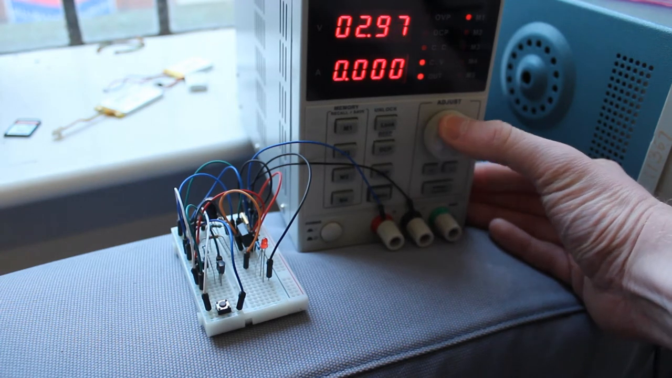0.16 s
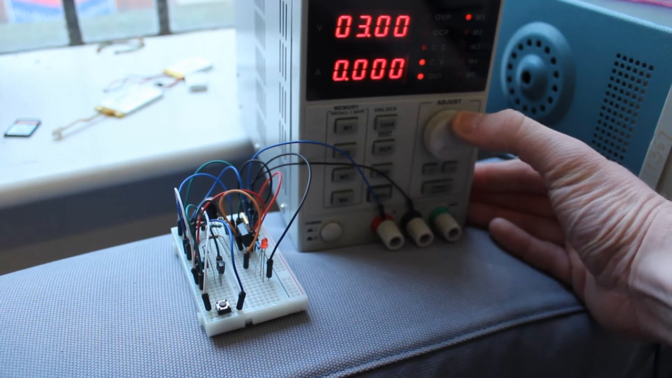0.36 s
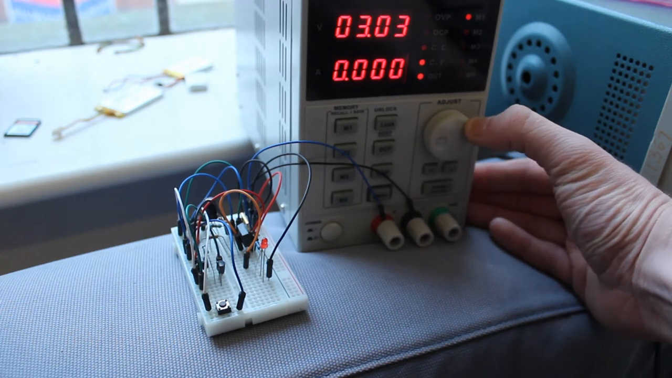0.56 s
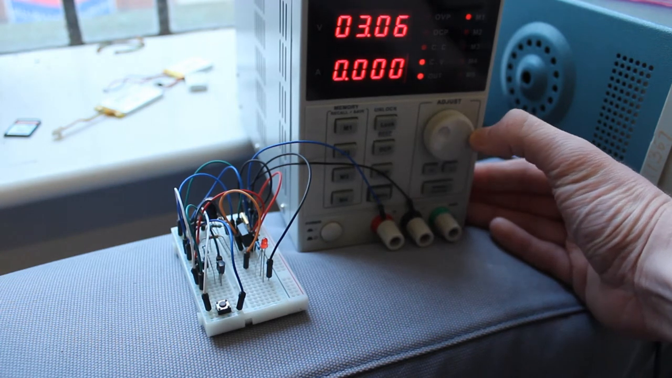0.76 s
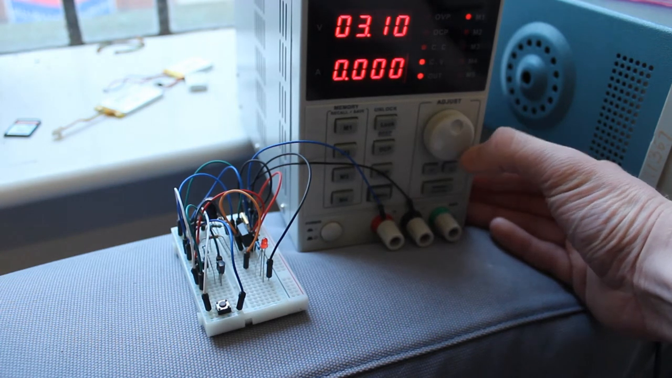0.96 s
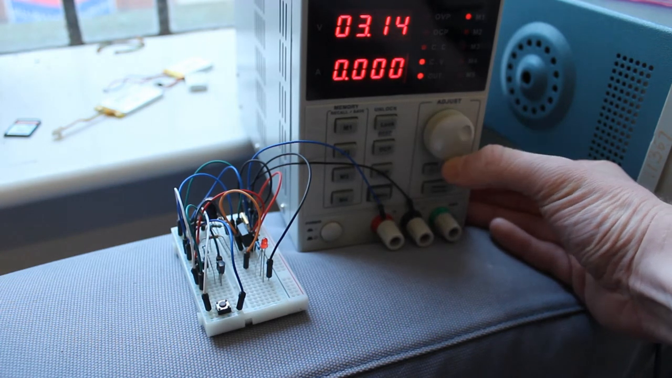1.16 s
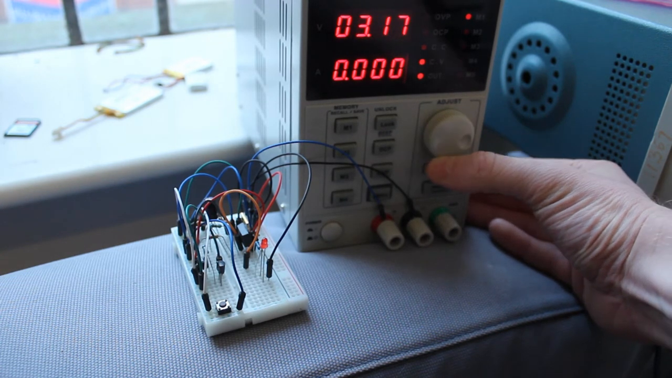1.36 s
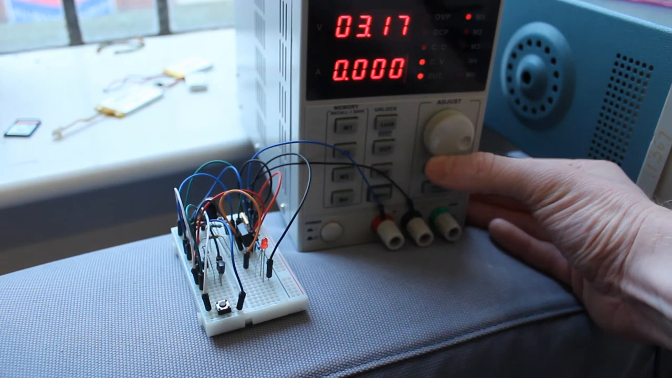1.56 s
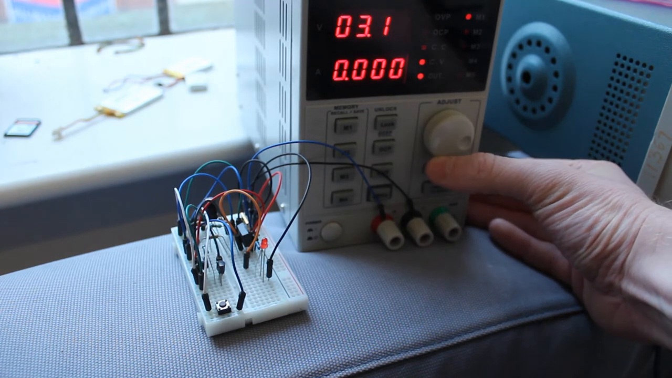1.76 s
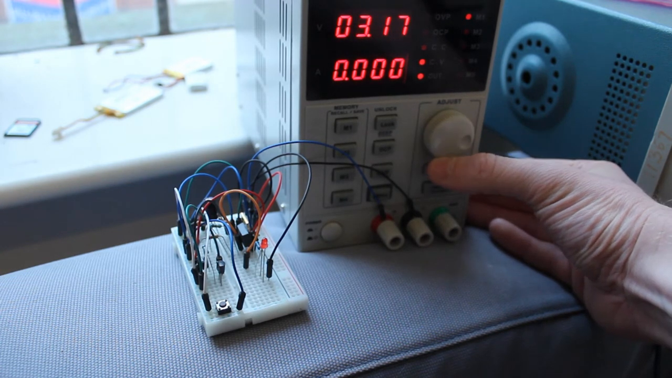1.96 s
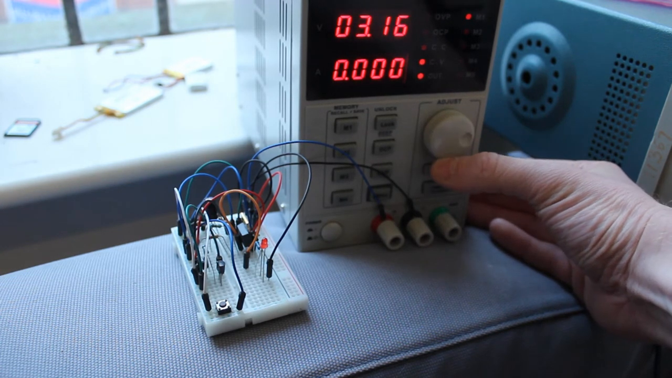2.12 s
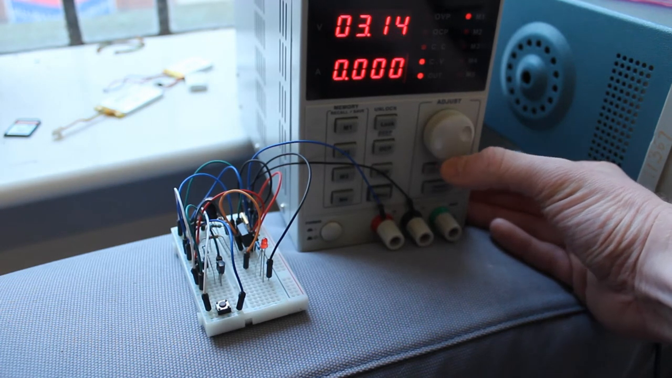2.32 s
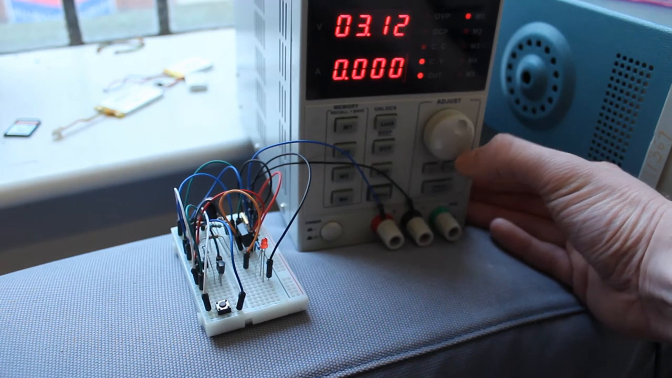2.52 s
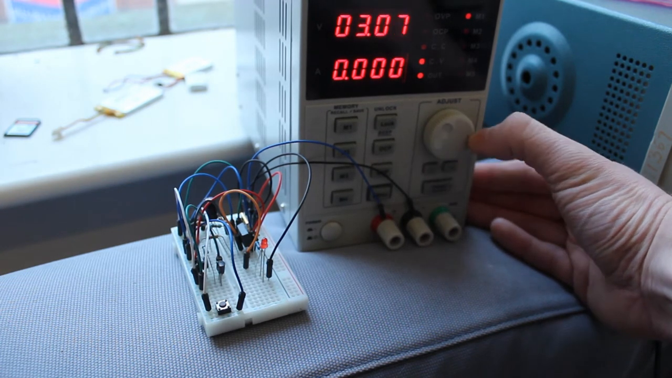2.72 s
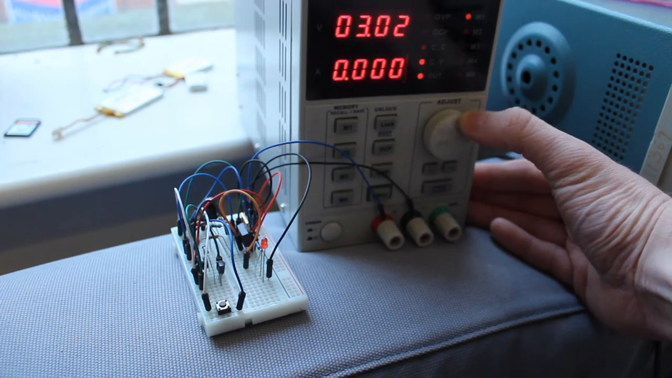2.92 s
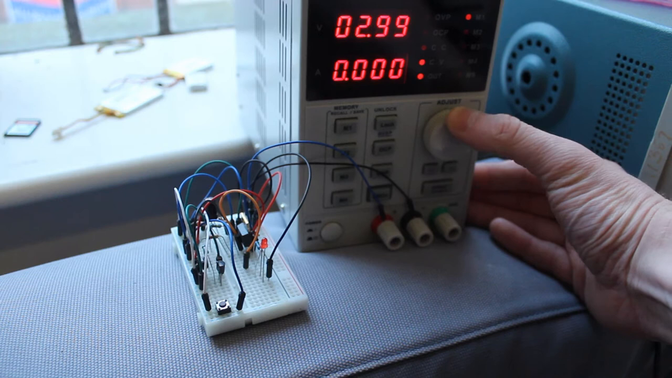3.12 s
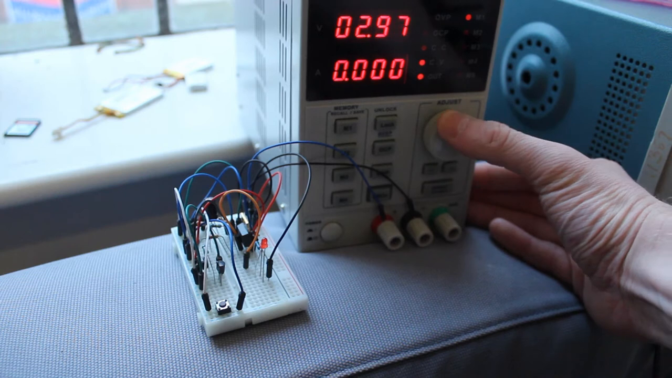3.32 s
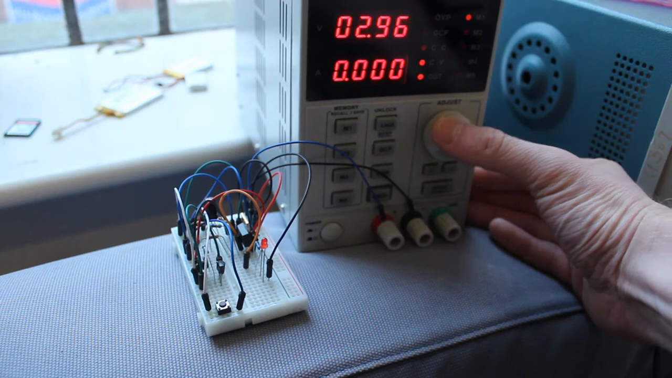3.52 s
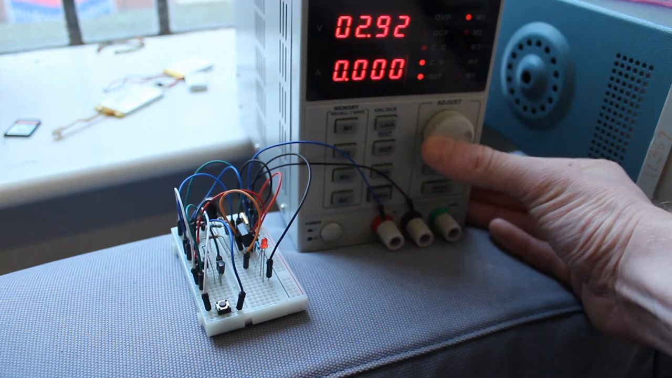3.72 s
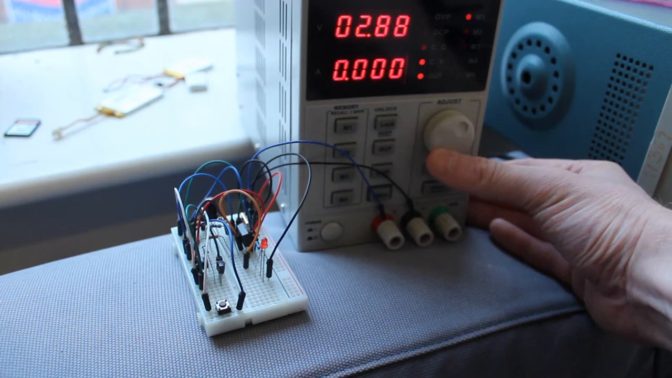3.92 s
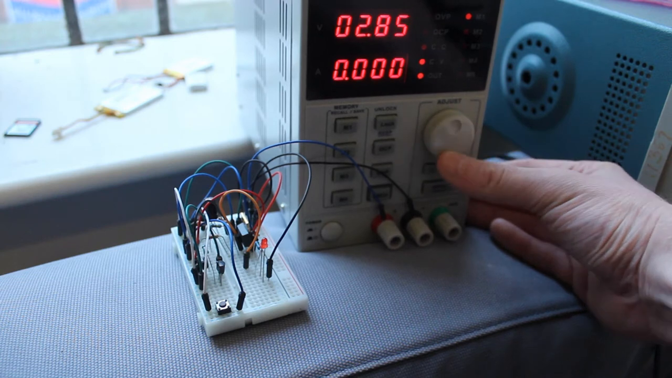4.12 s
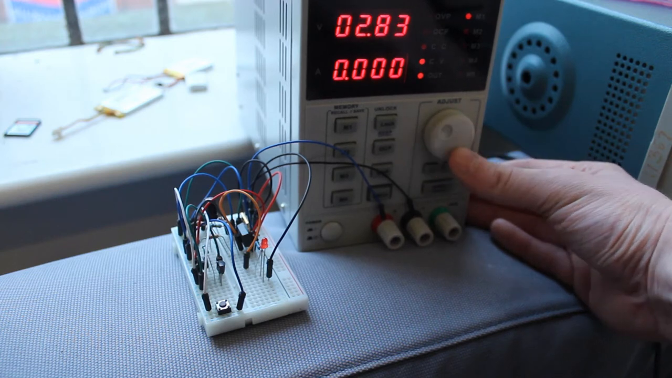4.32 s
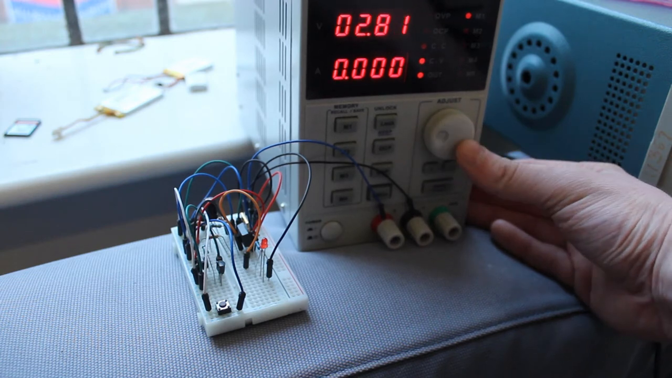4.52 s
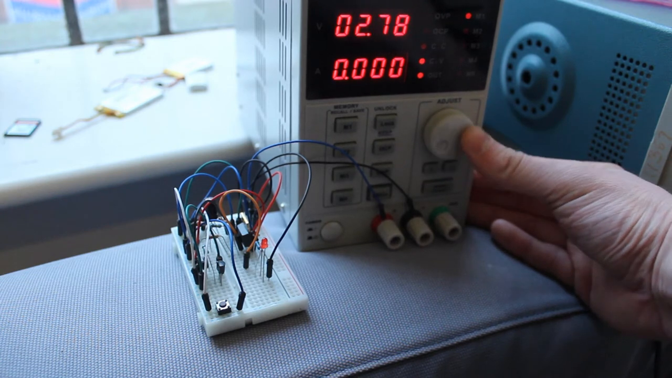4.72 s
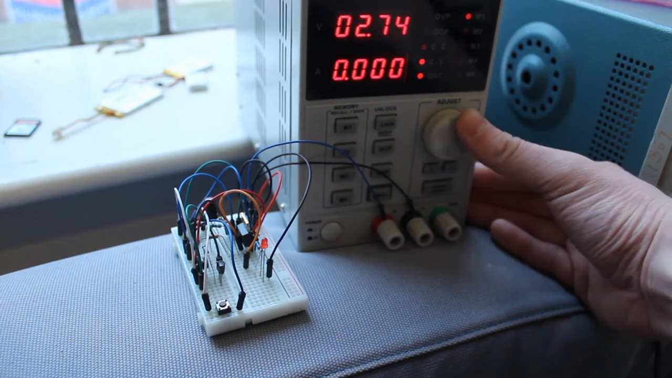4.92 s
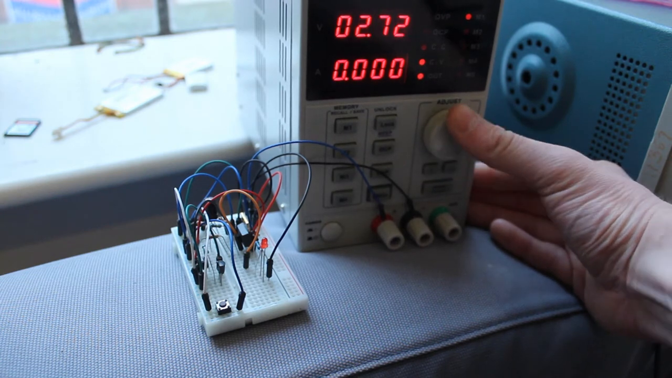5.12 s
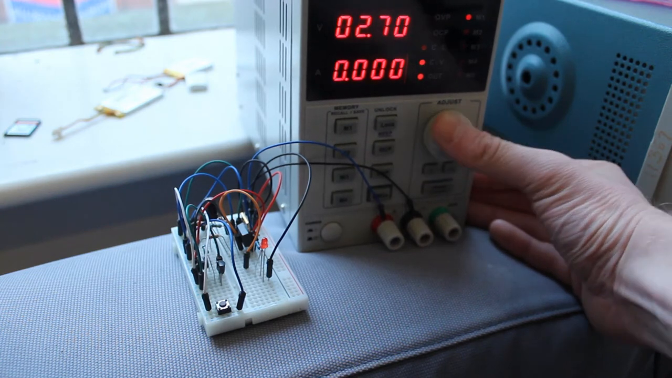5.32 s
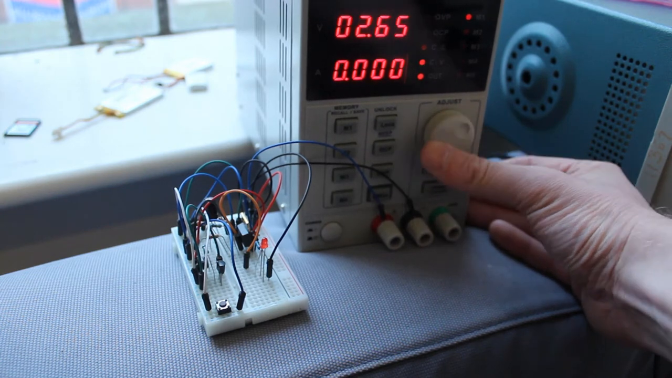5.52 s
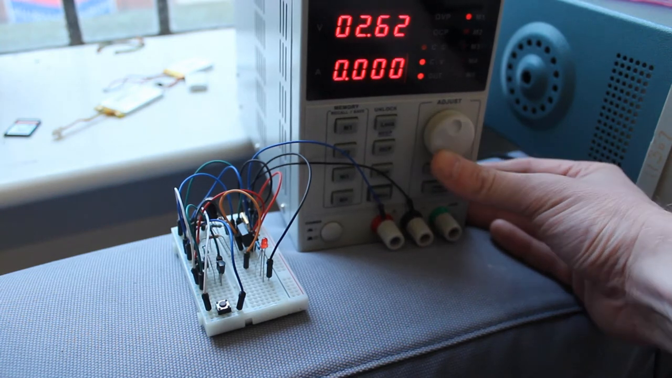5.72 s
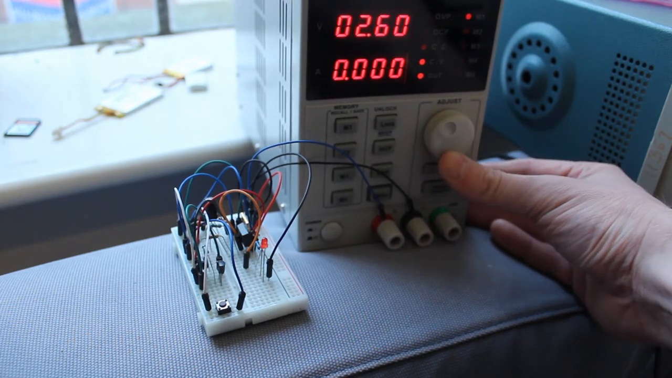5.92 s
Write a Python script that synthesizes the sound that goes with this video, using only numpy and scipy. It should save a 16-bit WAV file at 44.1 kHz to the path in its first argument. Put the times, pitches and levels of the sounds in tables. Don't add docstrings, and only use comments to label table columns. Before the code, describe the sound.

A small room with a steady, quiet fan rush, mostly low-mid and airy, fluttering slightly, with a very faint low mains hum. From about 0.1 s a notched knob is turned by hand near the microphone: hard, bright clicks, each a few milliseconds of spring snap and panel ring, roughly ten to fifteen a second in uneven clusters. A faint dull skin rub slips by at 0.5 s. Clicks become more spaced after 1 s and stop near 1.35 s. Only the fan and hum remain until 2.1 s, when clicking resumes, densest around 2.4 to 3.1 s, then somewhat sparser to about 4.1 s. It sweeps on, with another soft rub at 4.6 s and tight flurries near 4.8 and 5.4 to 5.6 s, thinning to a last click just after 6 s. Strength varies slightly; some rattle looser. Short, light room reverberation follows each.

```python
import sys
import numpy as np
from scipy import signal
from scipy.fft import rfft, irfft, next_fast_len
from scipy.io import wavfile
from scipy.ndimage import uniform_filter1d

SR = 44100
rng = np.random.default_rng(int(sys.argv[2]) if len(sys.argv) > 2 else 0)


def how_loud(loudness_db):
    steps = np.asarray(loudness_db, float) / 20
    return 10 ** steps


def store_pcm(level_fs):
    pcm = np.round(np.clip(level_fs, -1, 1) * 32767).astype(np.int16)
    wavfile.write(sys.argv[1], SR, np.atleast_2d(pcm).T)


N = 267642
FAINT_TOP_HZ = 15800


def detents():
    firm_up = [0.226, 0.2992, 0.4763, 0.5396, 0.6051, 0.6663, 0.7426, 0.9613, 1.2314, 1.3541]
    firm_back = [2.418, 2.499, 2.5684, 2.6006, 2.6875, 2.721, 2.74, 2.8286, 2.8551, 2.9475, 2.9602, 3.069,
                 3.1016, 3.4481, 3.6237, 3.7215, 3.7714, 3.9391]
    firm_on = [4.0863, 4.2439, 4.316, 4.3818, 4.452, 4.6433, 4.9028, 4.9453, 5.0764, 5.353, 5.4399, 5.5705,
               5.6912, 5.7717, 6.0526]
    # start_s, slack (0-1)
    loose = [(0.137, 0.4), (0.3714, .8), (0.4256, 0.8), (0.8267, 0.8), (0.8593, 0.2), (0.905, 0.86),
             (1.0765, .25), (1.1906, .35), (2.1235, .65), (2.2597, .25), (2.3552, .35), (2.9236, .7),
             (3.0018, .8), (3.319, .95), (3.5719, 0.3), (3.6816, .65), (3.8164, .45), (3.8753, .85),
             (4.0016, .45), (4.1677, 0.4), (4.603, .35), (4.7576, .45), (4.7855, .98), (4.8108, .25),
             (5.0089, .25), (5.198, .25), (5.422, 0.6), (5.4769, 0.74), (5.8751, 0.9)]
    light = [
        1.0157,
        1.1314,
        1.3012,
        3.2059,
        5.4602,
        5.5451,
        5.6148,
    ]
    muted = [
        .426,
        2.924,
        3.817,
        3.875,
        4.786,
    ]
    # panel_db, spring_db, shell_db, collar_db, longer (added factor of panel ring length)
    slack_rule = (-.4, -1, 0.8, 11.5, 0.0342)
    light_rule = (0.2, -3, -1.4, 2.5, 0.1417)
    back_rule = (0.17, 0.65, .1, .1, 0.035)
    scatter = (.4, 0.44, .3, .7, 0.031)

    earlier_s = -.06
    firm = firm_up + firm_back + firm_on + [earlier_s]
    loose_s, slack = np.transpose(loose)
    start_s = np.concatenate([firm, loose_s, light])
    change = np.vstack([
        np.zeros((len(firm), len(scatter))),
        np.outer(slack, slack_rule),
        [light_rule] * len(light),
    ])
    turns_back_s = 1.75
    change += np.outer(start_s > turns_back_s, back_rule)
    change += rng.standard_normal(change.shape) * scatter
    is_muted = np.abs(start_s[:, None] - muted).min(axis=1) < .005
    change[is_muted, 1] += -2.5
    return np.column_stack([start_s, change]).T[..., None]


def ring(modes, ms, linger):
    out = 0
    chance = rng.standard_normal((len(ms), len(modes), 3))
    for k, (hz, late_ms, swell_ms, db) in enumerate(modes):
        age_ms = np.maximum(ms - late_ms - .008 * chance[:, k, :1], 0)
        grown = age_ms / (swell_ms * linger)
        envelope = grown * np.exp(1 - grown)
        gain = (-1) ** k * how_loud(db + 1.93 * chance[:, k, 1:2])
        pitch_hz = hz * (1 + .004 * chance[:, k, 2:])
        out = out + gain * envelope * np.sin(2 * np.pi * pitch_hz * age_ms / 1000)
    rms_10ms = np.sqrt((out ** 2).sum(axis=1, keepdims=True) / (SR / 100))
    return out / rms_10ms


def knob(snaps, hold, size=1024, count=8192):
    # pitch_hz, late_ms, swell_ms, level_db
    panel = [(2321, 6.25, 2.67, -25), (2360, 4.0, 0.63, -16.5), (2780, 4.5, 2.7, -33.5),
             (2830, 2, 0.91, -19), (3232, 0.0, 1.62, -17.5), (3430, 6.5, 0.92, -22.0),
             (3588, 0.0, 1.9, -22.5), (3783, 2, 2.23, -10.5), (3900, 3, 3, -18), (3928, 0.0, 1.95, 0.0),
             (4260, 0.5, 2.7, -13.0), (4600, 3, 1.1, -17.5), (4780, 1, 0.87, -11.5),
             (5093, 2.5, 2.15, -15.5), (5426, 0.45, 1.94, -10.0), (5795, 0.5, 2.7, -18.5)]
    spring = [(6360, 2.5, 2.8, -19.5), (6560, 5, 0.28, -15), (6550, 6.48, 2.7, -21), (6654, 0.5, 1.6, -18),
              (6810, 2.0, 0.64, 0.0), (7180, 0.499, 2.5, -15.5)]
    shell = [(8045, 0.0, 1.28, -13.5), (8420, 0.5, 2, -22), (9110.0, 1.0, 0.53, -14.5),
             (9500, 4.5, 0.9, -18), (9790, 0.5, 0.29, -8.0), (9810, 1.3, 0.97, -19.0),
             (10580, -0.5, 2.2, -17.5), (10700, 5, 1.7, -32), (10920, 4, 0.7, -15),
             (11200, 6.5, 0.9, -17.5), (11260, 0.1, 0.71, -7.5), (11670, 0.5, 0.99, -15.5),
             (11900, 0.5, 0.28, -19.0), (12300, 4.5, 1.9, -29), (11960, 2.0, 0.49, -6.0),
             (12440, 3.5, 0.55, -7.0), (12700, 7.5, 0.72, -18.5), (12640, 0.0, 1.8, -17.5),
             (12650, 0.5, 0.28, -6), (13570.0, 3, 1.8, -25.0), (13900, 0.5, 0.3, -5),
             (14240.0, 0.0, 1.3, -16.5), (14600.0, 5.25, 0.9, -25.0), (14750, 1, 1.3, -20),
             (15000, 2.5, 0.3, -9.5), (15270, 1.5, 0.87, -10.5),
             (4385, .4, 1.55, -15.5), (10050, .6, .9, -17.5), (12670, 1.1, 1.5, -12)]
    collar = [(2714, 1.21, .9, -22.5), (4455, 0.608, 1.2, -18), (4850, 0.29, 0.84, -14),
              (6020, 0.593, 1.55, -11), (8710, 0.297, 0.85, -20)]
    casing = [(2082, 2.484, 1.6, -1.5), (1740, 1.46, 0.58, -10), (3922, 2.6, 1.25, 6.5)]
    part_db = [-25.5, -31.5, -28.5, -43.5, -42]

    start_s, panel_db, spring_db, shell_db, collar_db, longer = snaps
    linger = .97 + longer
    start = np.floor(start_s * SR).astype(int) - 40
    ms = 1000 * (np.arange(size) + start - start_s * SR) / SR + 0.16
    wave = how_loud(part_db[0] + panel_db) * ring(panel, ms, hold * linger ** 1.2)
    wave += how_loud(part_db[1] + spring_db) * ring(spring, ms, hold)
    wave += how_loud(part_db[2] + shell_db) * ring(shell, ms, hold)
    wave += how_loud(part_db[3] + 1.27 * (collar_db - 1.1)) * ring(collar, ms, hold)
    wave += how_loud(part_db[4] + 34 * (linger - 1)) * ring(casing, ms, hold)
    out = np.zeros(count + N + size)
    np.add.at(out, count + start + np.arange(size), wave)
    return out[:count + N]


def thumb():
    # start_s, level_db, pitch_hz, swell_s
    slips = [
        (.503, -35, 850, .008),
        (4.612, -30, 1110, 0.008),
    ]
    t = np.arange(N) / SR
    out = 0
    for start_s, db, hz, swell_s in slips:
        grown = np.maximum(t - start_s, 0) / swell_s
        octave_hz = [hz / np.sqrt(2), hz * np.sqrt(2)]
        band = signal.butter(2, octave_hz, "band", fs=SR, output="sos")
        rub = signal.sosfilt(band, rng.standard_normal(N))
        out = out + how_loud(db) * grown * np.exp(1 - grown) * rub
    return out


def convolve(x, h):
    size = next_fast_len(len(x) + len(h))
    return irfft(rfft(x, size) * rfft(h, size), size)[:len(x)]


def room():
    # late_ms, level_db
    echoes = [
        (10.2, -22),
        (13.1, -24),
        (16.5, -32),
    ]
    # centre_hz, t60_s, level_db
    decay = [(2000, 0.85, 0.46), (3920, 0.52, -0.5), (5250, 0.51, 2), (6000, 0.49, 0), (6850, 0.43, 1),
             (9000, 0.41, -4), (10900, 0.37, -0.6), (12500, 0.31, -2.5), (15000, 0.26, -3)]
    t = np.arange(SR) / SR
    centre_hz, t60_s, level_db = np.transpose(decay)
    hz = np.arange(SR // 2 + 1) + 1.
    tail = 0
    for k in range(len(centre_hz)):
        share = np.interp(np.log(hz), np.log(centre_hz), np.eye(len(centre_hz))[k])
        share = share * (hz < FAINT_TOP_HZ)
        band = irfft(np.sqrt(share) * rfft(rng.standard_normal(SR)), SR)
        tail = tail + band * how_loud(level_db[k] - 60 * t / t60_s[k])
    rise_s = .016
    tail *= 1 - np.exp(-(t / rise_s) ** 2)
    response = tail * how_loud(-13) / np.sqrt(np.sum(tail ** 2))
    for late_ms, db in echoes:
        response += how_loud(db) * np.sinc(np.arange(SR) - late_ms * SR / 1000)
    return response


def walk(rate):
    k = int(SR / rate)
    held = np.repeat(rng.standard_normal(N // k + 1), k)
    return 0.93 * uniform_filter1d(uniform_filter1d(held, k), k)[:N]


def fan():
    # pitch_hz, level_db (per Hz)
    spectrum = [(20, -21), (40, -19), (75, -17), (130, -18.5), (223, -13), (330, -9.5), (463, -6),
                (620, -11.5), (800, -10), (1050, -17), (1700, -19), (2400, -25.5), (5000, -34),
                (9000, -40.5)]
    # centre_hz, width_hz, lift_db
    resonances = [(230.5, 18, 4), (500, 73, 5.5), (738, 136, 4.5), (2137, 69, 8.5)]
    hz = np.arange(N // 2 + 1) * SR / N + 1e-3
    point_hz, point_db = np.transpose(spectrum)
    gain = how_loud(np.interp(np.log(hz), np.log(point_hz), point_db))
    for centre_hz, width_hz, lift_db in resonances:
        gain *= how_loud(lift_db / (1 + (2 * (hz - centre_hz) / width_hz) ** 2))
    gain *= hz < FAINT_TOP_HZ
    noise = gain * rfft(rng.standard_normal(N))
    octave = np.clip(np.log2(hz / 125), 0, 6)
    rush = 0
    for k in range(7):
        share = np.clip(1 - np.abs(octave - k), 0, 1)
        rush = rush + how_loud(0.47 * walk(4.85)) * irfft(noise * share, N)
    return rush * how_loud(-43) / np.sqrt(np.mean(rush ** 2))


def hum():
    # pitch_hz, level_db (rms)
    tones = [
        (49.3, -53.5),
        (99.6, -65),
        (231, -61),
    ]
    t = np.arange(N) / SR
    out = 0
    for hz, db in tones:
        level = np.sqrt(2) * how_loud(db + 1.2 * walk(5.87))
        out = out + level * np.sin(2 * np.pi * hz * t)
    return out


def scene():
    snaps = detents()
    direct = knob(snaps, hold=1)[-N:]
    walls = convolve(knob(snaps, hold=0.6), room())[-N:]
    return (direct + walls + thumb() + fan() + hum())[None]


def band_limit(x):
    return signal.sosfilt(signal.butter(12, 16810, fs=SR, output="sos"), x)


def record(dry):
    low_pass = signal.butter(12, 15800, fs=SR, output="sos")
    return band_limit(signal.sosfilt(low_pass, dry))


dry = scene()
out = record(dry)
store_pcm(out)
```